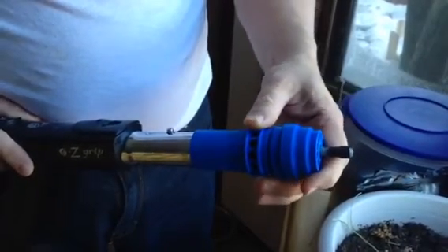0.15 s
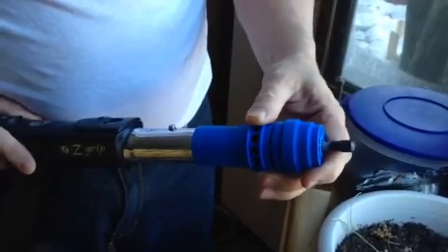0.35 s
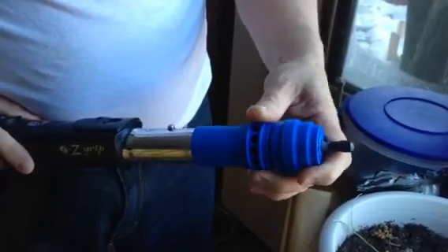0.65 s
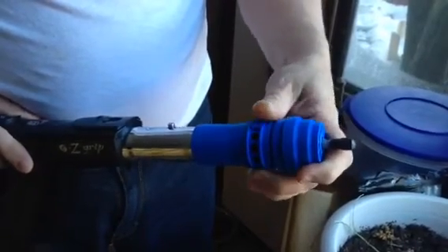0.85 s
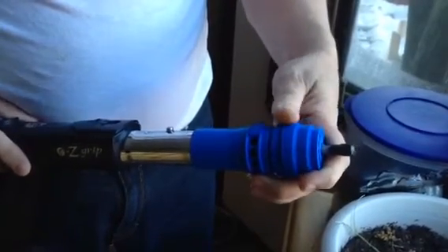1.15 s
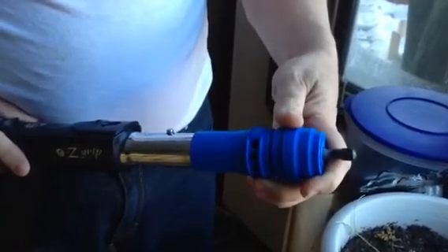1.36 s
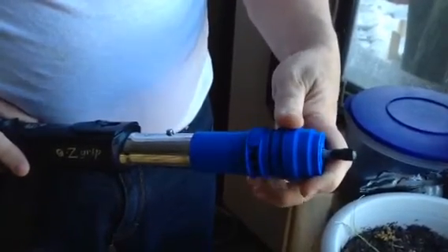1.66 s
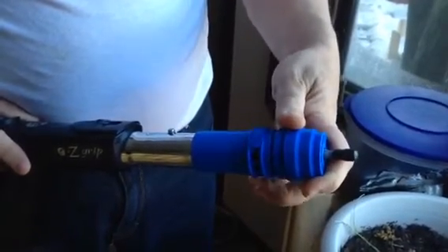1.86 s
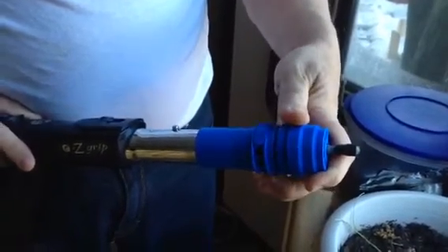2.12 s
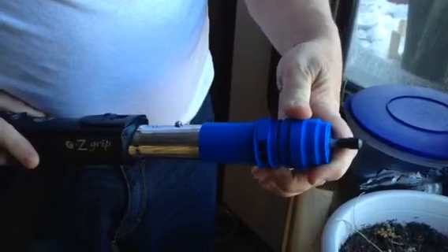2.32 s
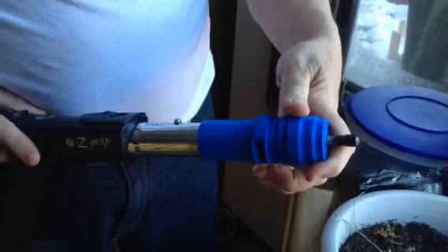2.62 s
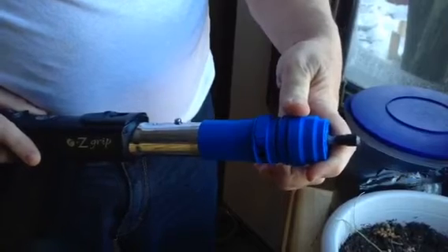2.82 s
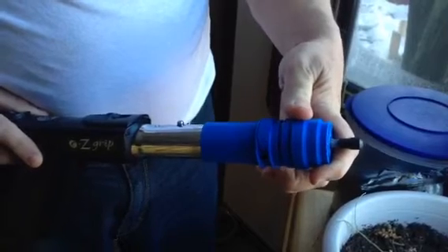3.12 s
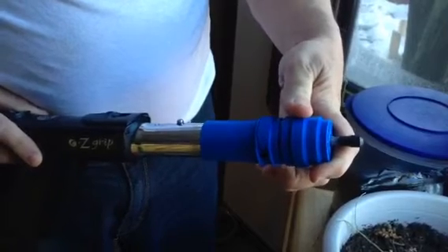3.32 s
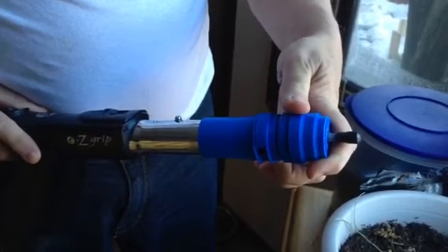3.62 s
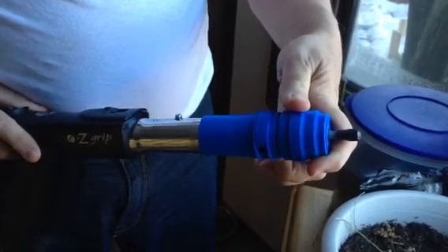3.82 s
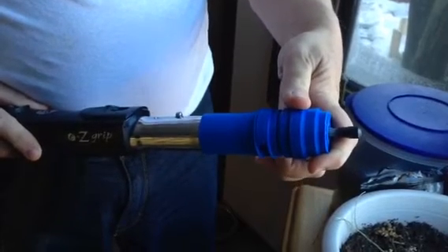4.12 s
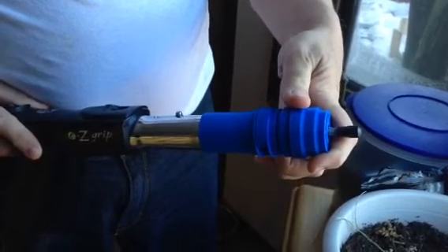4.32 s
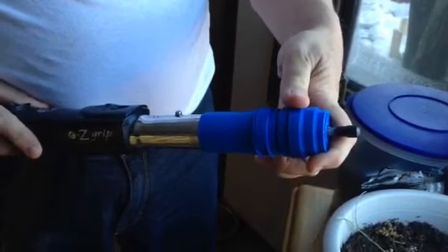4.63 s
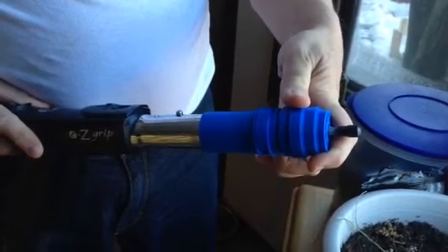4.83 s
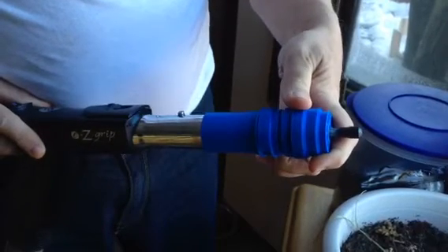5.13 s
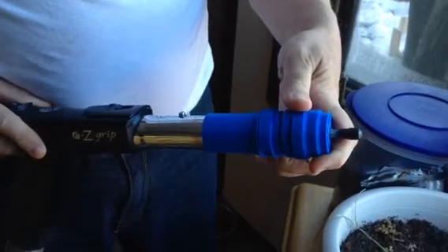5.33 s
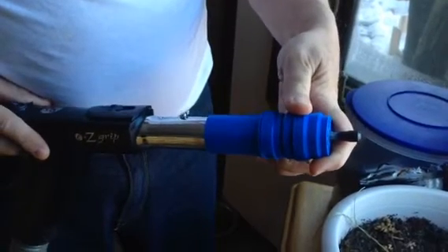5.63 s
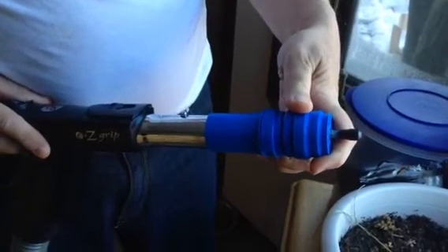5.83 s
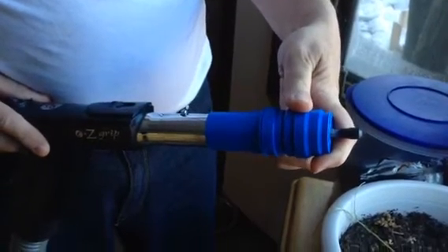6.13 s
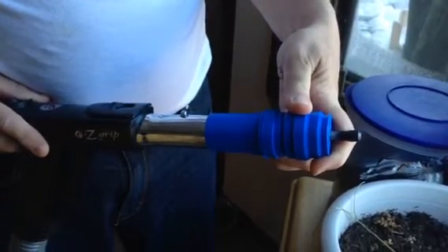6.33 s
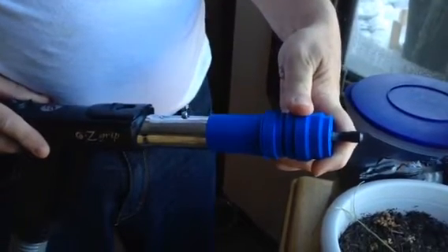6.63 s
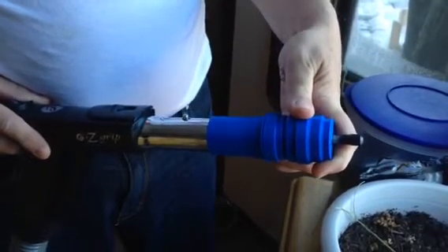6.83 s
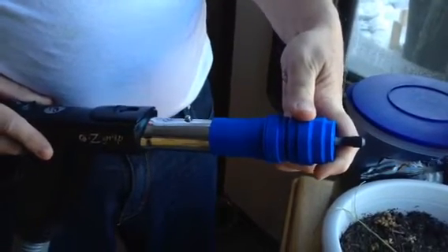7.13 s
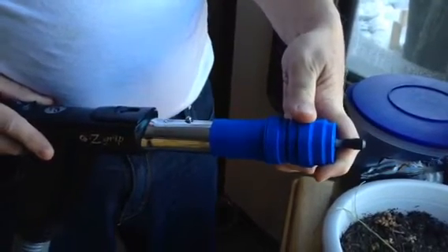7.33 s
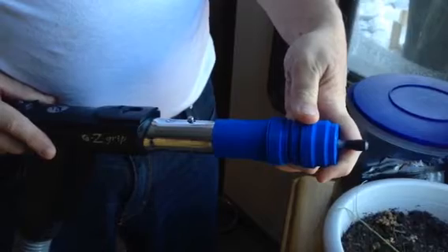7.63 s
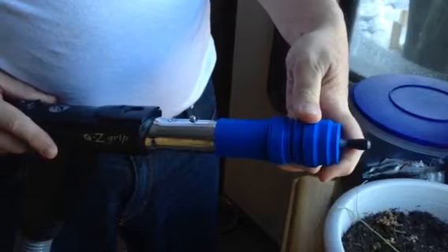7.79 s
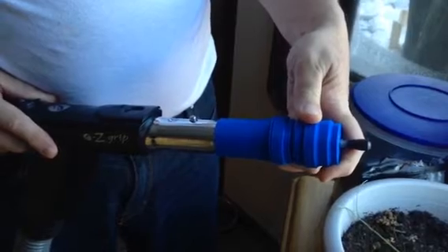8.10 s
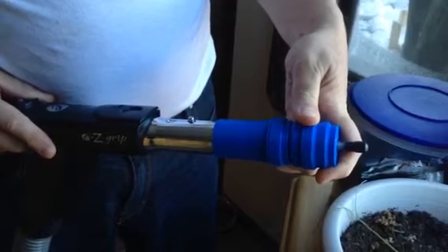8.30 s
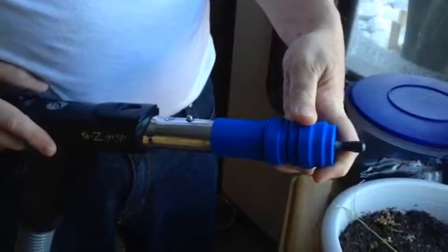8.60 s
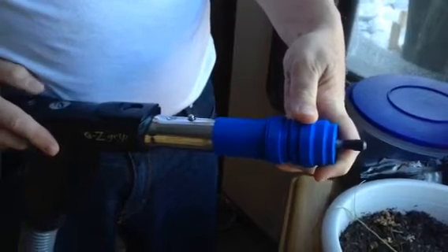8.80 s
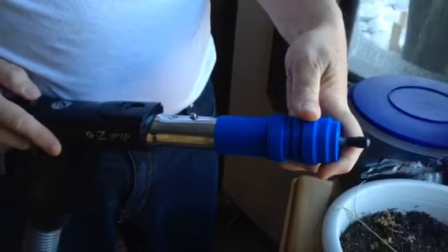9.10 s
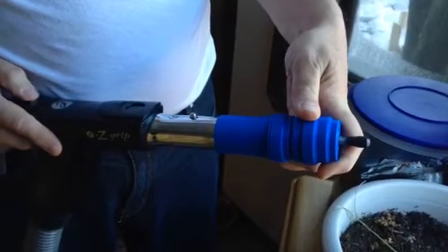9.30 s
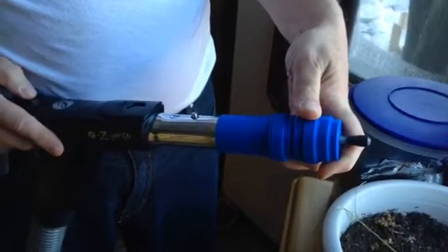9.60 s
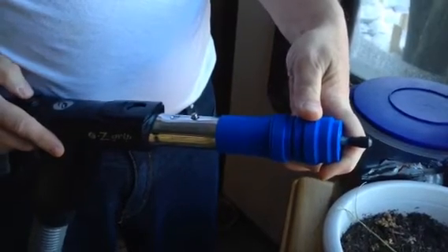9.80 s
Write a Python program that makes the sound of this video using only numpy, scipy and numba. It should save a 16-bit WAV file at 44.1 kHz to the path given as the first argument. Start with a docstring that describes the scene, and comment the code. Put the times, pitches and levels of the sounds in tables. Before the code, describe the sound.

A vacuum cleaner draws air through a small turbine tool, heard close up in a room with a short echo. From the start, a high whistle and lower whining tones sound over a bright hiss and roar of air. The pitch dips slightly until about 0.5 seconds, with a soft, dull knock at 0.3 seconds. The turbine then speeds up, slowly at first and more quickly from about 1.7 seconds. Its whistle flutters, swelling and fading irregularly as it climbs, and the lower tones grow stronger. Air rings hollowly in the pipe and housing, shifting in color around 4.5 seconds. The whistle is thin and piercing by 8 seconds and levels off from about 8.5 seconds, roughly three times its starting pitch. The highest hiss dulls from there until the end at 10 seconds. A faint mains hum continues underneath.

```python
"""A vacuum cleaner's small twelve-bladed turbine whistles indoors, speeding up as its collar opens.
The whistle and the tones of the unbalanced shaft climb, swelling and fading as they meet their own
echoes in the room. Rushing air hisses, roars and rings in the pipe and housing.
Behind it are a dull knock near the start and a faint mains hum. The top treble dulls near the end."""
import sys
import numpy as np
from scipy import signal
from scipy.fft import rfft, irfft, next_fast_len
from scipy.io import wavfile
from scipy.ndimage import uniform_filter1d
from numba import njit

SR = 44100
rng = np.random.default_rng(int(sys.argv[2]) if len(sys.argv) > 2 else 0)


def to_wav(sig):
    """Store sig (one row per channel, or 1-D mono) as 16-bit WAV at the path in sys.argv[1].

    Samples outside -1..1 are clipped; the rate is SR.
    """
    pcm = np.clip(np.atleast_2d(sig), -1, 1) * 32767
    pcm = np.round(pcm).astype(np.int16)
    wavfile.write(sys.argv[1], SR, pcm.T)  # frames by channels


N = 438794

BLADES, BOTTOM_HZ, TOP_HZ = 12, 48, 15250
# Moments when the whistle and its echo add up: time_s, level_db
WHISTLE_PEAKS = [(0,-22.5),(.14,-19),(.29,-16.5),(.52,-20),(.63,-24),(.8,-15.5),(.9,-18.5),(1.1,-22.5),(1.38,-15.5),(1.64,-16),(1.75,-15),(1.85,-18),(1.93,-9.5),(2.03,-14),(2.09,-21.5),(2.22,-15),(2.42,-12.5),(2.57,-12.5),(2.67,-19.5),(2.76,-8.5),(2.83,-9),(2.93,-17),(2.99,-9),(3.07,-24.5),(3.2,-10),(3.37,-16.5),(3.46,-17),(3.61,-12),(3.7,-18),(3.76,-13.5),(3.84,-14),(4,-26),(4.16,-13.5),(4.29,-15.5),(4.5,-12),(4.62,-19),(4.75,-18),(4.91,-7.5),(5.03,-21),(5.13,-12.5),(5.2,-17),(5.34,-17),(5.53,-18),(5.67,-11),(5.89,-12.5),(6.13,-25.5),(6.26,-15),(6.4,-16.5),(6.51,-12),(6.65,-17),(7,-14),(7.36,-12.5),(7.47,-10.5),(7.55,-16),(7.68,-14),(7.93,-5),(8.26,-14),(8.43,-13.5),(8.51,-10),(8.62,-12),(8.71,-10.5),(8.82,-7),(9,-11.5),(9.13,-11),(9.22,-12.5),(9.31,-12),(9.41,-11.5),(9.62,-12.5),(9.81,-10.5),(9.95,-13)]
# Echo strength against the direct whistle: pitch_hz, share (0 to 1)
ECHO_SHARE = [(4000, 0.56), (9000, 0.58), (12400, 0.37)]
# The tone an octave above the whistle: time_s, level_db
OCTAVE_LEVELS = [(0, -28), (.7, -30.5), (1.5, -35), (2.4, -38), (3.3, -31), (4.2, -37)]
def blade_whistle(shaft_hz, flutter):
    """Passing blades chop the air into a whistle; its echo partly cancels it between peaks."""
    peak_db, echo_phase = curves([(s, db, 2 * np.pi * k) for k, (s, db) in enumerate(WHISTLE_PEAKS)])
    share = np.interp(BLADES * shaft_hz, *np.transpose(ECHO_SHARE))
    size = undb(peak_db) * np.abs(1 + share * np.exp(1j * echo_phase)) / (1 + share)
    out = tone(shaft_hz, BLADES, size * (1 + 0.24 * flutter * walk(50)))
    out += tone(shaft_hz, 2 * BLADES, undb(curves(OCTAVE_LEVELS)[0]) * fading(1.0, 16))
    return out + tone(shaft_hz, 3 * BLADES, undb(-42) * walk(15))


# One row per shaft tone: full_speed_db, growth_db_per_octave, fading_share
SHAFT_TONES = [(0.45, 10, 0.14), (-1.2, 12.5, 0.23), (-0.8, 12, 0.21), (-1.4, 18.5, 0.2), (-0.5, 15, .5),
               (0.3, 9, 0.54)]
# How well housing and room carry each pitch: pitch_hz, gain_db
CARRYING = [(300,-22),(322,-21.5),(335,-30),(385,-36),(440,-23),(520,-24),(580,-31.5),(630,-30.5),(820,-27.5),(900,-30),(1002,-39),(1013,-27),(1030,-37),(1065,-24),(1150,-29),(1260,-27),(1340,-34),(1590,-25.5),(1640,-30),(1800,-26),(1930,-29),(1978,-39),(1996,-22),(2024,-42),(2044,-28),(2065,-24),(2200,-31.5),(2410,-25),(2470,-37),(2520,-19),(2680,-22),(2800,-28.5),(2880,-28),(3040,-39),(3090,-27.5),(3400,-29.5),(3720,-35.5),(3850,-23),(4040,-37),(4070,-25),(4105,-27),(4125,-38),(4300,-28),(5100,-42.5),(7500,-38),(9000,-36),(11300,-29.5)]
def shaft_tones(shaft_hz, flutter, octaves):
    """Unbalance and uneven blades sound at multiples of the shaft speed; higher tones sputter more."""
    out = np.zeros(N)
    for multiple, (db, growth_db, share) in zip([1, 2, 3, 4, 5, BLADES - 1], SHAFT_TONES):
        size = undb(db + growth_db * octaves) * shaped(CARRYING)(multiple * shaft_hz)
        size *= fading(share, 5.5)
        sputter = 1 + min(0.12 * multiple, 0.36) * flutter * walk(45)
        out += tone(shaft_hz, multiple, size * sputter)
    return out


# Quieter shaft tones: speed_multiple, relative_db
WEAK_TONES = [(6, -45), (7, -43), (8, -42), (9, -45), (10, -45)]
def weak_tones(shaft_hz, octaves):
    """Faint wavering tones that grow as speed makes the unbalance shake harder."""
    growth = undb(13 * octaves)
    return sum(tone(shaft_hz, multiple, undb(db) * growth * (2.0 + 0.97 * walk(6.5)))
               for multiple, db in WEAK_TONES)


# How fast the shaft turns: time_s, speed_hz
SHAFT_SPEED = [(0,319.9),(.15,309.3),(.43,296.5),(.58,297.5),(.84,309.5),(1.02,321.4),(1.27,320.3),(1.41,326),(1.55,326.5),(1.72,338.2),(1.9,374),(2.17,413),(2.27,420.5),(2.43,430.3),(2.89,465),(3,492.4),(3.17,519),(3.28,529),(3.43,553),(3.68,588),(3.8,601),(3.98,619),(4.19,634),(4.48,667),(4.62,699),(4.69,689),(4.82,702),(4.96,731.4),(5.23,769),(5.48,795),(5.74,819.3),(5.95,831),(6.21,841.5),(6.51,861.4),(7.01,912.4),(7.27,933.5),(7.67,962.4),(7.95,981),(8.24,997),(8.4,1006),(8.56,1012.5),(9.04,1021),(9.4,1026),(9.73,1030),(9.95,1029.5)]
def turbine():
    """The spinning rotor makes tones and sucks air; the tones flutter more while the speed changes."""
    shaft_hz, = curves(SHAFT_SPEED)
    octaves = np.log2(shaft_hz / shaft_hz.max())  # 0 at full speed, negative below
    glide = uniform_filter1d(np.abs(np.gradient(octaves)) * SR, size=SR // 2)  # octaves a second
    flutter = glide / (glide + 0.035)
    tones = blade_whistle(shaft_hz, flutter) + shaft_tones(shaft_hz, flutter, octaves)
    return tones + weak_tones(shaft_hz, octaves) + air(octaves)


# Air loudness, housing ring level, and how bright the top treble sounds (it dulls near the end):
# time_s, level_db, housing_db, brightness_db
AIR_LEVELS = [(0,-23,4,-1.5),(.6,-22.5,2,-7),(1.5,-23,4,-7),(2.5,-22,-1,-5.5),(3.1,-23.5,-4.5,-4.5),(3.8,-20.5,-6,-8),(4.2,-22,-1,-6),(4.4,-23,6,-3),(4.75,-24.5,6.5,-2.5),(4.95,-26,3,-2),(5.2,-24.5,2,-3),(5.8,-24.5,3,-1),(6.4,-24,-4,-2.5),(7,-25,-12,-4),(7.5,-24.5,-2.5,-7),(8.2,-25.5,-4,-7),(8.8,-23.5,-9,-16),(9.95,-25,-4.5,-30)]
# Tone colour of the hiss: pitch_hz, level_db
HISS_COLOUR = [(400, -60), (1200, -18.5), (1600, -17), (2000, -3), (3200, 0), (5500, 1), (8500, 1.5),
               (11000, -1.5)]
# Tone colour of the roar: pitch_hz, level_db
ROAR_COLOUR = [(25, -50), (45, -42), (95, -18.5), (190, -17.5), (280, -13.5), (600, -10.5), (900, -9),
               (1400, 0.5), (2200, -11.5), (4000, -28)]
def air(octaves):
    """Swirling air makes a bright hiss and a low roar, and sets pipe and housing ringing."""
    level_db, housing_db, brightness_db = curves(AIR_LEVELS)
    cutoff_hz = HISS_COLOUR[-1][0]
    hiss = noise(lambda f: shaped(HISS_COLOUR)(f) / np.sqrt(1 + (f / cutoff_hz) ** 16))
    roar = noise(shaped(ROAR_COLOUR)) * undb(-21.5 - 3 * octaves + 1.16 * walk(9.7))
    rings = pipe(octaves) + undb(housing_db) * housing() + hollow_rings(octaves)
    top_treble = undb(brightness_db) * ring(hz=11300, width_hz=11200, db=-1.5)
    return undb(level_db) * (hiss + roar + rings + top_treble)


# The housing ring that stays in place: pitch_hz, width_hz, level_db
HOUSING_RINGS = [(3580, 1100, -13.5)]
# The upper ring, which moves: time_s, pitch_hz
SLIDING_PITCH = [(0, 4128), (1.5, 4120), (2.8, 3897), (4.2, 3627), (4.45, 3648), (4.78, 4300), (5.3, 4340),
                 (6.1, 4290), (7, 4210), (9.95, 4188)]
def housing():
    """Air rings in the turbine housing; the upper ring slides as fingers turn the collar."""
    lower = sum(ring(*row) * undb(2.0 * walk(9)) for row in HOUSING_RINGS)
    return lower + undb(-6 + 0.92 * walk(13)) * sliding_ring(*curves(SLIDING_PITCH), width_hz=1330)


# Where the pipe rings: pitch_hz, width_hz, level_db
PIPE_RINGS = [(920, 166, -21), (1670, 90, -17), (2190, 960, -6.5), (6760, 420, -13.5), (9600, 560, -19.5)]
def pipe(octaves):
    """Air rings in the pipe, less strongly as the rotor speeds up."""
    return undb(-10.5 - 7.5 * octaves) * sum(ring(*row) * undb(1.1 * walk(7.6)) for row in PIPE_RINGS)


# Narrow rings in the hiss: pitch_hz, width_hz, level_db
HOLLOW_RINGS = [(2593, 80, -19), (3610, 210, -23)]
def hollow_rings(octaves):
    """Hollow notes come and go in the rushing air."""
    return sum(ring(*row) * undb(6.1 * walk(8) - 3 - 2.5 * octaves) for row in HOLLOW_RINGS)


# Two bumps close together: start_s, level_db, pitch_hz, length_s
BUMPS = [(0.29, -30, 240, 0.011), (0.332, -21.5, 255, 0.014)]
def knock():
    """A dull knock: each soft push gives a few low vibrations."""
    out = np.zeros(N)
    for start_s, db, hz, length_s in BUMPS:
        t = np.arange(int(length_s * SR)) / SR
        at = int(start_s * SR)
        out[at:at + len(t)] += undb(db) * np.sin(np.pi * t / length_s) * np.sin(2 * np.pi * hz * t)
    return out


# Mains tone and its overtones: pitch_hz, level_db
HUM_TONES = [(59.3, -75), (118.6, -66), (178, -67)]
def hum():
    """Mains power makes the motor hum, wavering a little."""
    t = np.arange(N) / SR
    return sum(np.sqrt(2) * undb(db + 1.8 * walk(12)) * np.sin(2 * np.pi * hz * t)
               for hz, db in HUM_TONES)


def room(x, echo_db=-19, decay_s=0.36):
    """The walls add a short wash of echoes."""
    t = np.arange(SR // 4) / SR
    tail = rng.standard_normal(len(t)) * np.exp(-np.log(1000) * t / decay_s) * (t > .004)
    return x + undb(echo_db) * signal.fftconvolve(x, tail / np.sqrt(np.sum(tail ** 2)))[:N]


def tone(shaft_hz, multiple, size):
    """A pure tone locked to the shaft, silent above TOP_HZ."""
    angle = 2 * np.pi * np.cumsum(shaft_hz) / SR
    heard = multiple * shaft_hz < TOP_HZ
    return heard * np.sqrt(2) * size * np.sin(multiple * angle + 2 * np.pi * rng.random())


def fading(share, rate_hz):
    """Gain of a tone met by wandering echoes of itself."""
    return np.hypot(1 + share * walk(rate_hz), share * walk(rate_hz)) / np.sqrt(1 + 2 * share ** 2)


def ring(hz, width_hz, db):
    """Noise gathered around one pitch."""
    return undb(db) * noise(lambda f: 1 / (1 + ((f - hz * hz / f) / width_hz) ** 2))


def sliding_ring(hz, width_hz):
    """Noise gathered around a moving pitch."""
    angle = 2 * np.pi * np.cumsum(hz) / SR
    slow = lambda f: 1 / (1 + (2 * f / width_hz) ** 2)
    return noise(slow) * np.cos(angle) + noise(slow) * np.sin(angle)


def noise(gain):
    """Noise of strength 1, coloured by a gain for each pitch."""
    size = next_fast_len(N)
    white = rfft(rng.standard_normal(size))
    x = irfft(white * gain(np.arange(1, len(white) + 1) * SR / size), size)[:N]
    return x / np.std(x)


def walk(rate_hz):
    """A smooth random wobble around zero."""
    hold = int(SR / rate_hz)
    steps = np.repeat(rng.standard_normal(N // hold + 1), hold)
    return 1.72 * uniform_filter1d(uniform_filter1d(steps, hold), hold)[:N]


def shaped(table):
    """Turn pitch_hz, level_db rows into a gain for any pitch."""
    hz, db = np.transpose(table)
    return lambda f: undb(np.interp(np.log(f), np.log(hz), db))


def curves(table):
    """Join timed rows with straight lines, one curve per value column."""
    time_s, *columns = np.transpose(table)
    return [np.interp(np.arange(N) / SR, time_s, column) for column in columns]


def undb(db):
    """Turn decibels into a gain."""
    return 10 ** (np.asarray(db) / 20)


@njit
def follow(x, rise, fall):
    """Track a level, with separate speeds up and down."""
    out, level = np.empty(len(x)), x[0]
    for i in range(len(x)):
        level += (x[i] - level) * (rise if x[i] > level else fall)
        out[i] = level
    return out


def scene():
    """The cleaner in its room, the same in both channels."""
    return np.tile(room(turbine() + knock()) + hum(), (2, 1))


def record(dry):
    """Automatic volume evens out swells, peaks are rounded, and deep bass and top treble are cut."""
    attack_s, release_s, target_db, ratio, squash = 0.062, 0.21, -11, 1.79, 0.83
    power = uniform_filter1d(dry[0] ** 2, size=441)
    loudness = np.sqrt(follow(power, 1 / (attack_s * SR), 1 / (release_s * SR)))
    gain = (undb(target_db) / loudness) ** (1 - 1 / ratio)
    rounded = np.tanh(squash * dry * gain) / squash
    bass_cut = signal.sosfilt(signal.butter(2, BOTTOM_HZ, "high", fs=SR, output="sos"), rounded)
    return signal.sosfilt(signal.ellip(14, .3, 60, TOP_HZ, fs=SR, output="sos"), bass_cut)


dry = scene()
out = record(dry)
to_wav(out)
```